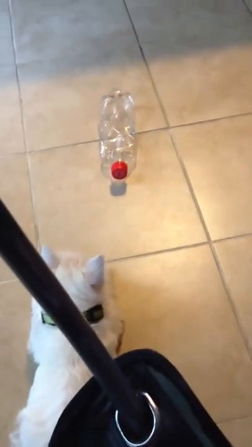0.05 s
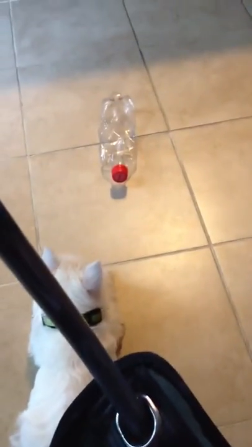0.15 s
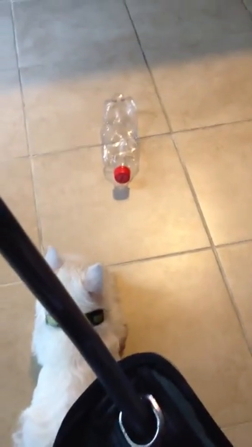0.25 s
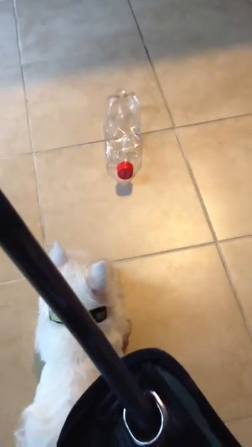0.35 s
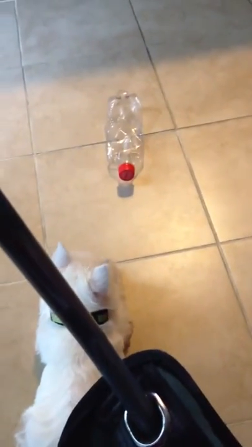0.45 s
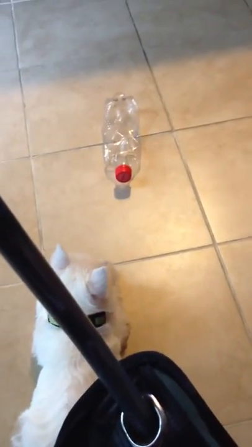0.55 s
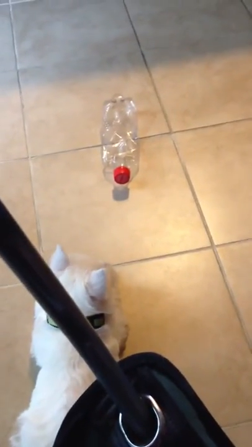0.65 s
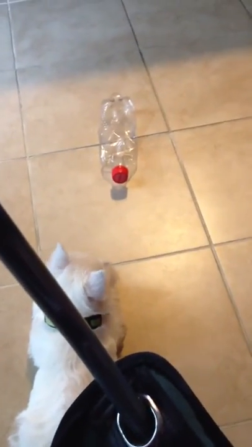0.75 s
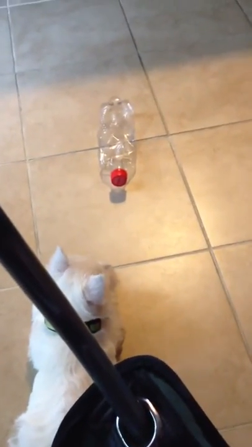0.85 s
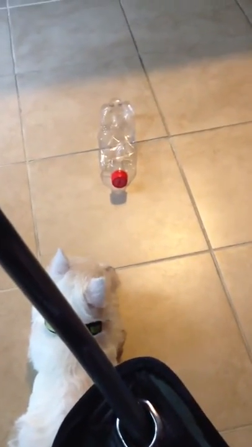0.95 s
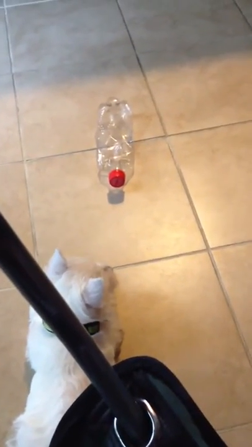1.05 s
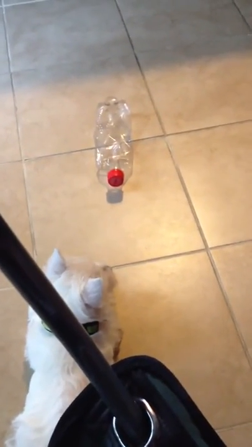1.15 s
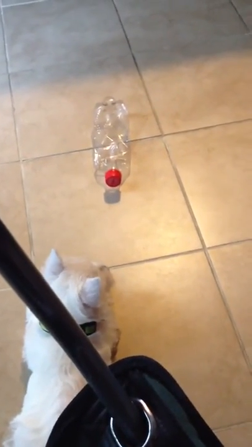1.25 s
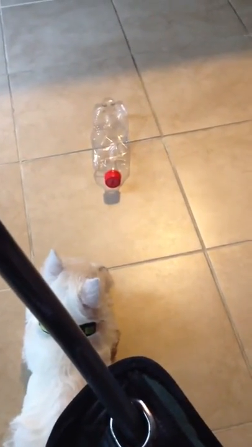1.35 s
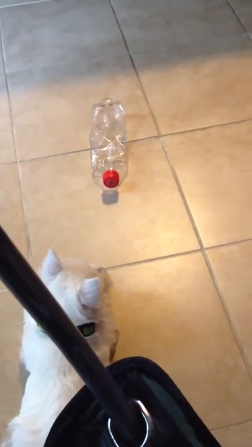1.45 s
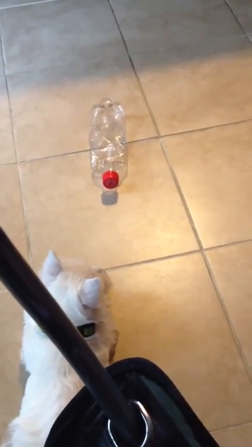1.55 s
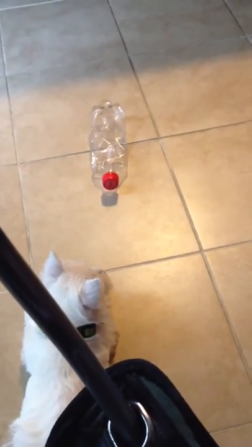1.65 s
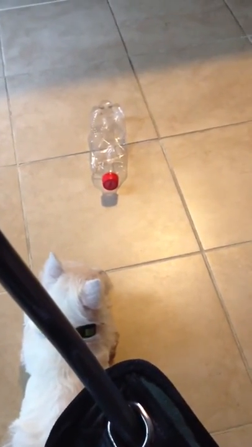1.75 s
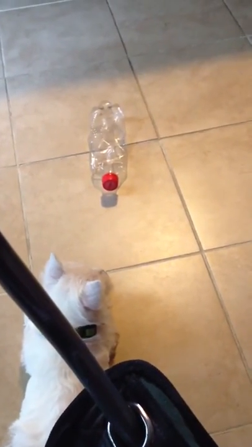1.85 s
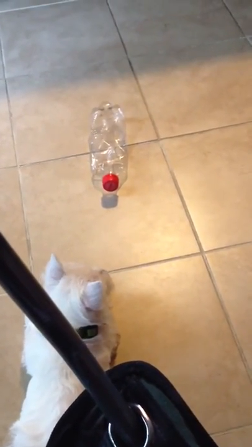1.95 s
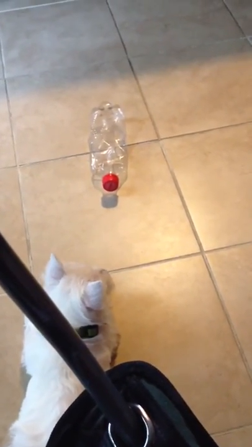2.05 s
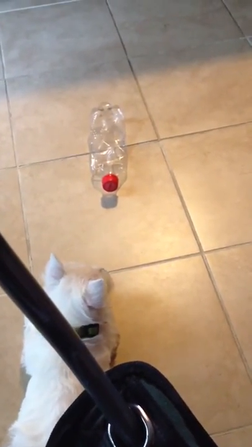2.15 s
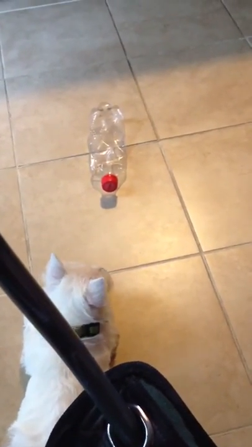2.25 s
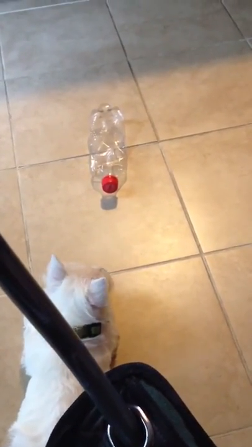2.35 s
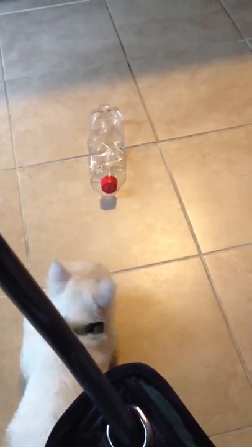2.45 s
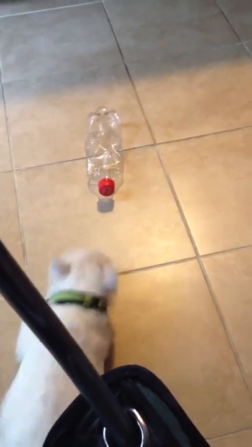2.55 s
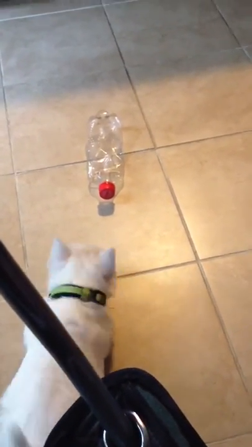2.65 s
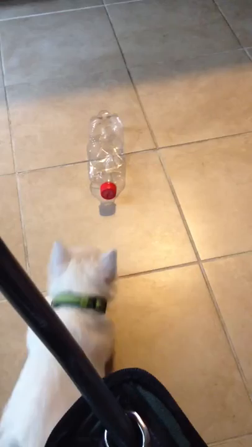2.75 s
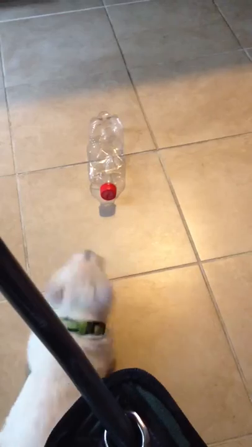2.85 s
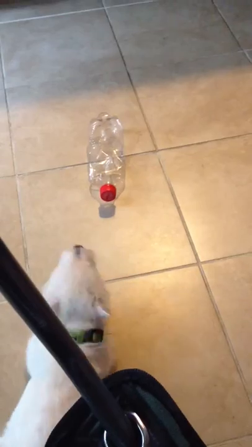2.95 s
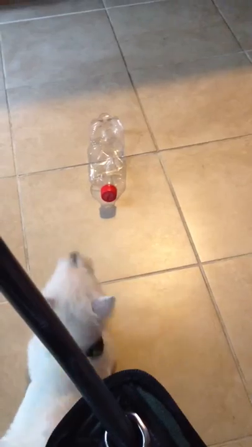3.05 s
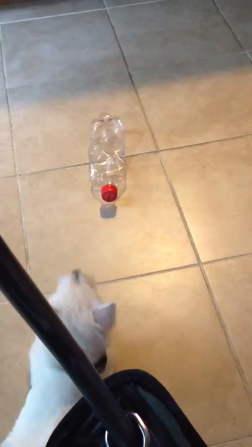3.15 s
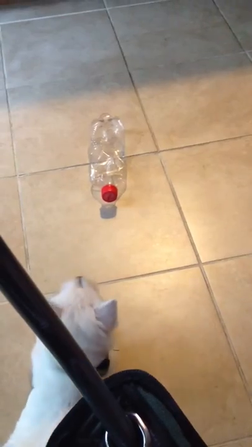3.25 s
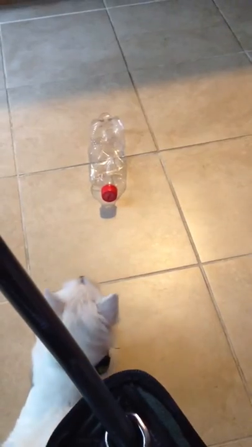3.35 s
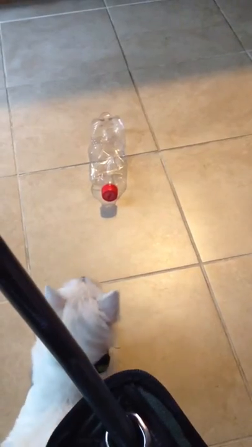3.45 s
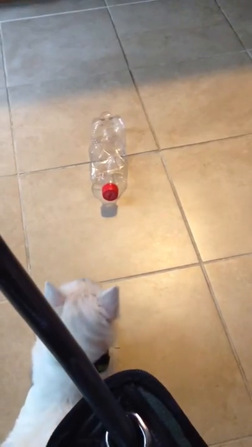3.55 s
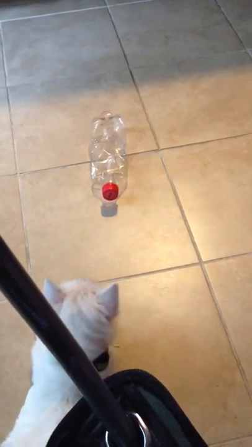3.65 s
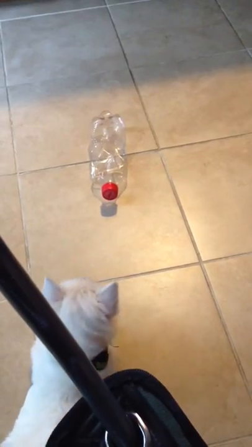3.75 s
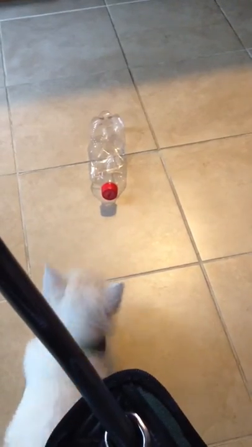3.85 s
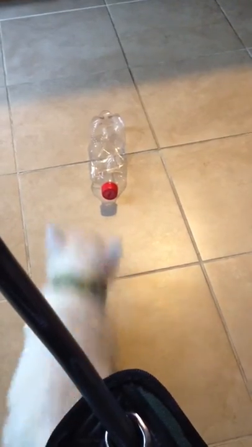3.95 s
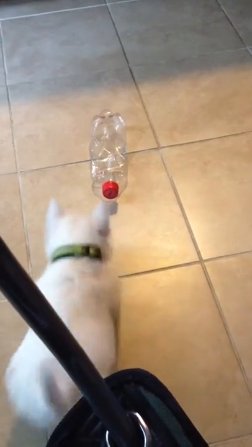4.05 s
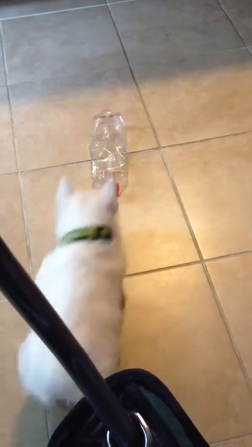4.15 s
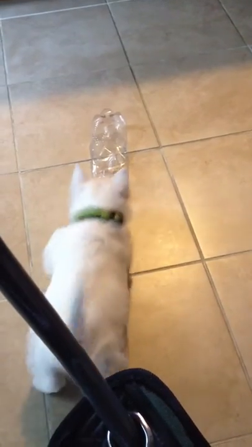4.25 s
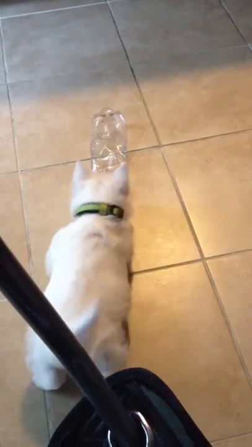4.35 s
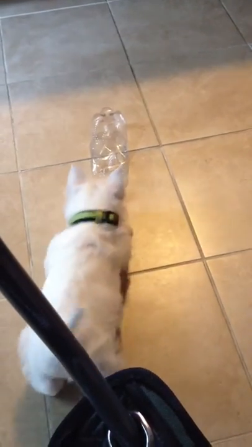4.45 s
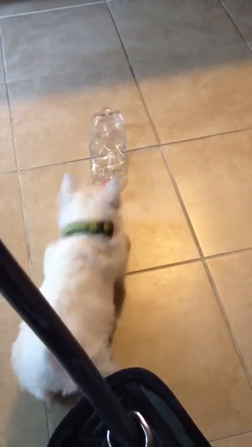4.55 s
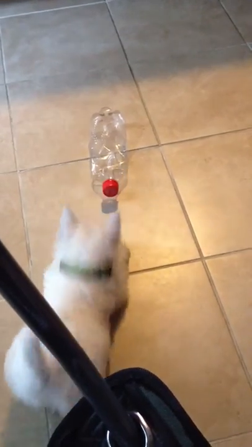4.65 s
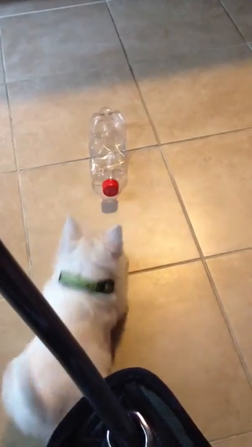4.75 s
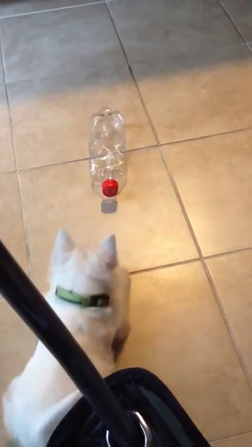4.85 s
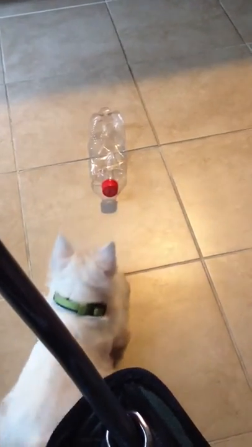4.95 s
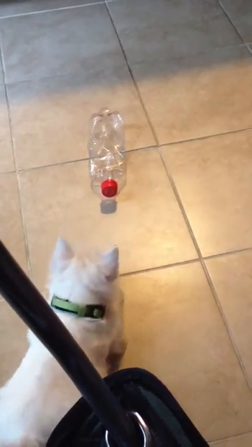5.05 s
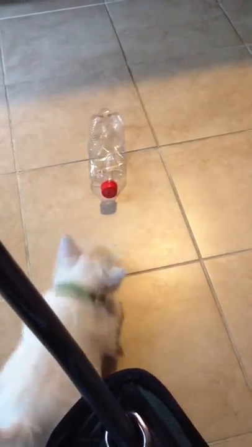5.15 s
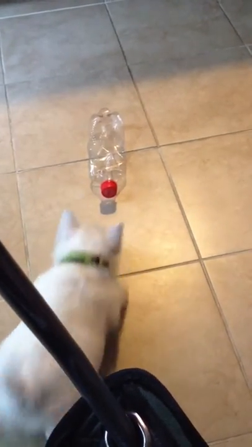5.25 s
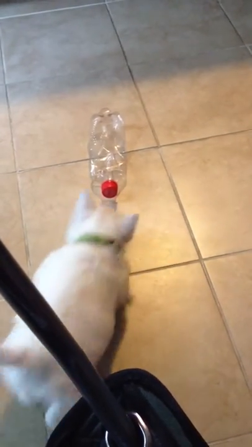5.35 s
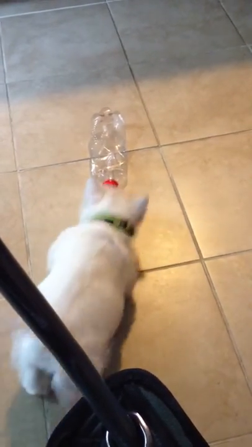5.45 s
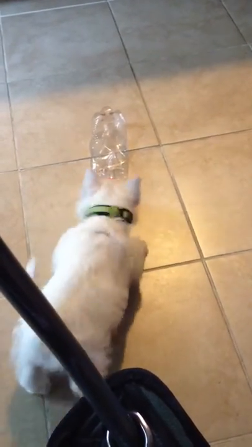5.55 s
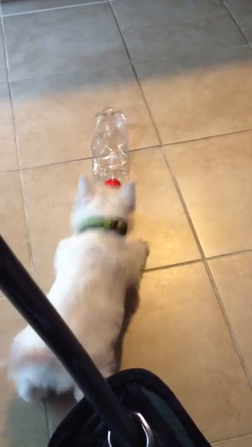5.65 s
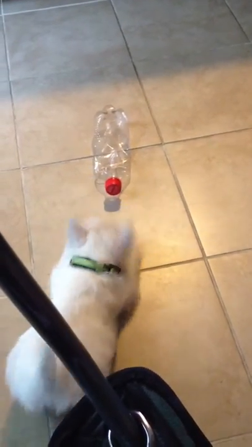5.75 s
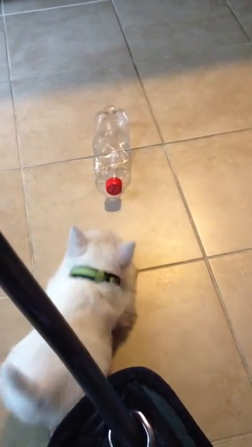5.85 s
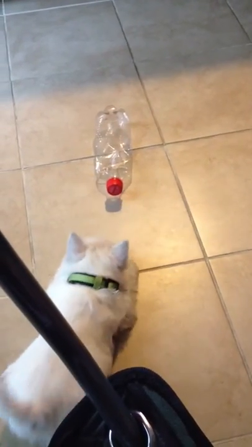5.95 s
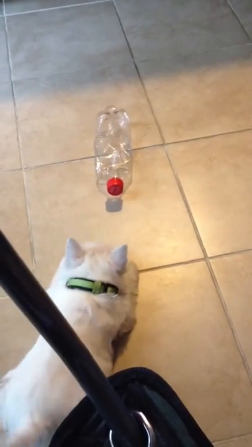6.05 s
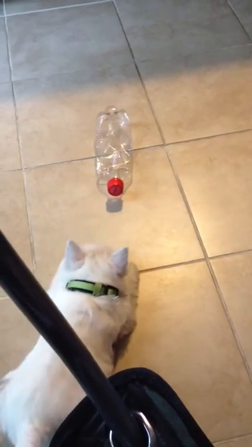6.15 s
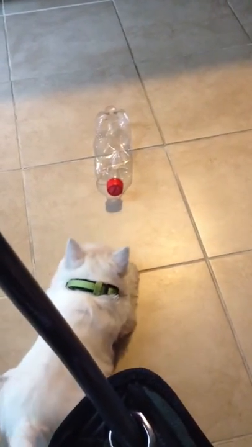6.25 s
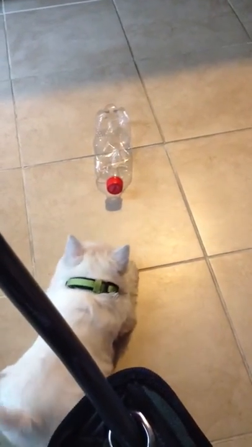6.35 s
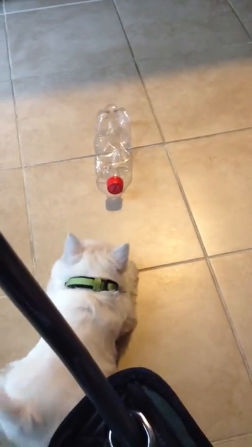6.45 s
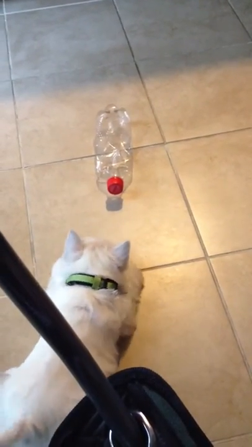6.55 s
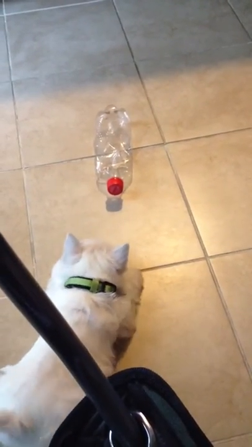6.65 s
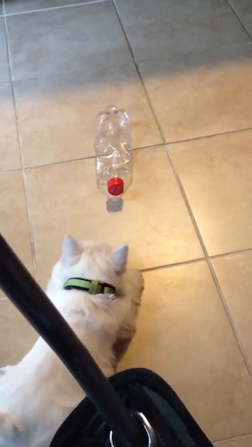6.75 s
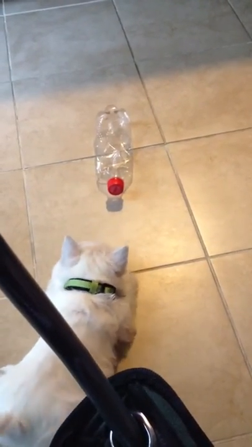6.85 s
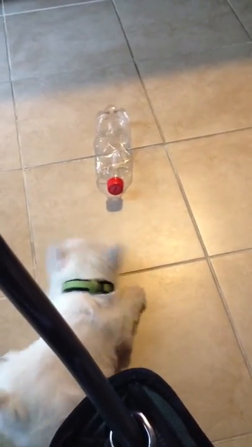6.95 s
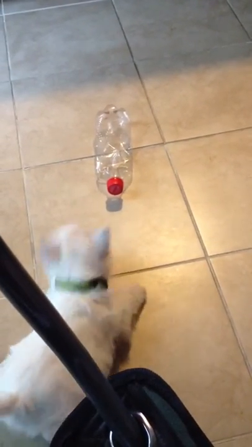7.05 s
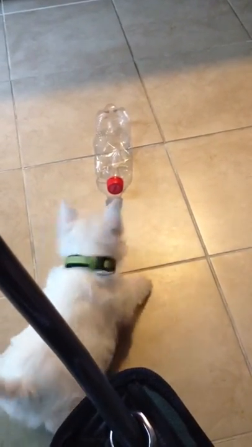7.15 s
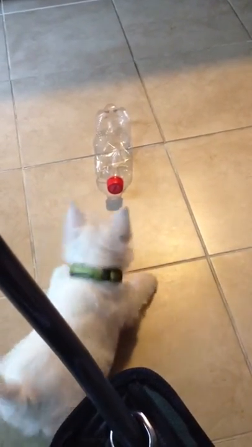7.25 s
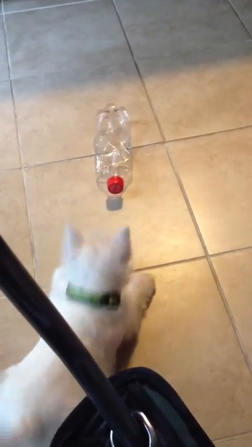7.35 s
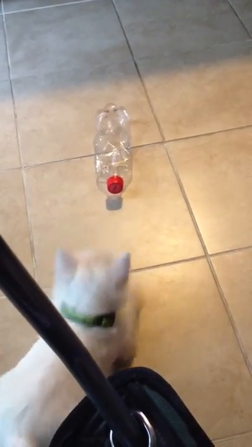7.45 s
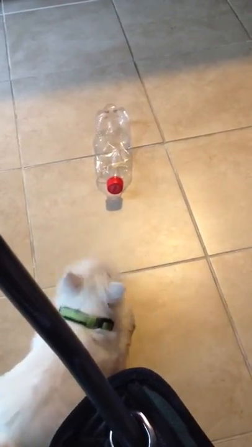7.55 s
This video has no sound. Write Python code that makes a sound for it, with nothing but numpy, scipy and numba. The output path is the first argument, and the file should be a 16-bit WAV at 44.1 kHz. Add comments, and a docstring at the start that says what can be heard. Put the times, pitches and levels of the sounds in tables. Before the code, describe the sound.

A small puppy is heard close by in a hard, echoing tiled room over a very quiet, steady, low-leaning hum. Soft airy sniffs come at about 0.1, 0.4 and 0.7 s, with a fainter one at 1.1 and a tiny paw and claw touch at 1.4. Two sharp yaps leap up in pitch at 2.5 and 2.9 s, each brief, with bright reflections ringing on. A very faint low growl grows from 3.4 into a rising, rougher woof at 3.8-4.1. At 4.4 a loud, crisp claw tick lands with a soft pad thud; another thud and a short sniff follow near 4.65. A strong, hoarse yap hits at 5.15. Low fluttering growls follow at 5.4, 5.8 and 6.1-6.8, then a muffled woof at 7.0 and a last rattling growl from 7.45 to the end. The small microphone gives little deep bass.

```python
"""A puppy in a hard, bare, tiled room, over a quiet steady hum made of coloured noise.
It sniffs (shaped noise) and a paw lands softly; then come two yaps, a low growl and a woof.
A claw ticks loudest, a pad thuds and one more sniff follows; then a yap, growls, a woof and a last growl.
Calls are vocal-fold pulses and breath sent through chest, throat and mouth; low growls flutter
about 25 times a second. Claws and pads are short dying tones, and the room adds an echoing tail."""
import sys
import numpy as np
from scipy import signal
from scipy.fft import rfft, irfft, next_fast_len
from scipy.io import wavfile
from scipy.ndimage import uniform_filter1d
from numba import njit

SR = 44100
rng = np.random.default_rng(int(sys.argv[2]) if len(sys.argv) > 2 else 0)


def persist_wave(psi):
    """Save psi, clipped to +-1, as 16-bit WAV."""
    counts = np.round(np.clip(psi, -1, 1) * 32767).astype(np.int16)
    wavfile.write(sys.argv[1], SR, np.atleast_2d(counts).T)


N = 335601

# Colour of the room hum. Each row: frequency in Hz, strength in dB per Hz (only the shape counts).
HUM_COLOUR = [(25, -29.5), (60, -23), (147, -3), (240, -0.5), (420, -5.5), (600, -7), (1100, -9),
              (2400, -17.5), (4500, -18), (7500, -21), (9800, -25), (12000, -22.5), (15300, -19)]
HUM_DB = -64  # average (rms) level before the microphone

# Puffs of air through the nostrils. Each row: start of full flow in seconds, start of release in seconds,
# level in dB, fall in dB per second.
SNIFFS = [(0.116, 0.248, -63, 131), (0.381, .436, -59, 136), (0.63, 0.753, -57.5, 115),
          (1.113, 1.15, -70, 72), (4.625, 4.633, -54, 300)]
# Colour of the sniffing air. Each row: frequency in Hz, strength in dB per Hz (only the shape counts).
SNIFF_COLOUR = [(880, -29), (1500, -14.5), (1960, -9.5), (2210, -10.5), (2500, -9), (4910, -6),
                (15000, -9.5)]
SNIFF_RISE_DB_PER_S = 300

# How the hard walls answer. Each row: frequency in Hz, time to die by 60 dB in seconds,
# level of the tail in dB relative to the direct sound.
ROOM = [(150.9, 0.17, 0.5), (380, 0.32, -5), (860, 0.27, 5), (1830, 0.39, -1.5), (3000, 0.39, -1.5),
        (4460, 0.45, -5), (7060, 0.24, 2), (15000, 0.12, -5)]
# Narrow bands where the room holds a clear yap's overtones longest. Each row: frequency in Hz, level in dB,
# time to die by 60 dB in seconds.
ROOM_RINGS = [(3790, -2, .6), (4745, 3, .95)]

# Claws touching the tile. Each row: time in seconds, strength in dB.
CLAWS = [(1.4441, -43.5), (3.789, -43), (4.4054, -17.5), (4.4114, -28), (4.4174, -32)]
# Tones in each claw tick. Each row: frequency in Hz, level in dB added to the strength,
# time to die by 60 dB in seconds.
CLAW_TONES = [(2300, -7, .002), (3500, -2, .0015), (4400, 0, .002), (5600, -2, .0015), (7000, -5, .0015),
              (12000, -7, .0015)]
# Paw pads landing. Each row: time in seconds, strength in dB before the soft rise and decay, frequency in Hz.
THUDS = [(1.442, -41.5, 570), (4.409, -33, 300), (4.669, -34.5, 260.3)]
THUD_CYCLES = 10  # swings it takes a thud to die by 60 dB

# One curve per bark or growl, in order of time. Each row of a curve: time in seconds, pitch in Hz,
# throat resonance in Hz, voice level in dB before any flutter, mouth level in dB over the voice.
CALL_CURVES = [
    [(2.392, 235.1, 835, -59, -17), (2.44, 324.6, 1260, -51.5, -12), (2.47, 391, 1160, -30, -3.5),
     (2.495, 524.2, 1500, -19.5, 1), (2.505, 886, 1410, -34, 14.5), (2.53, 928.7, 824, -28.5, 9.5),
     (2.56, 927.6, 890, -22, -16), (2.577, 977, 955, -19, -0.5), (2.587, 613.7, 1260, -15.5, -14.5),
     (2.61, 439, 1320, -37.5, 5.5), (2.65, 230, 1270, -48.5, 5)],
    [(2.805, 239.4, 1024, -42, -2), (2.83, 340, 1180, -32.5, -17.5), (2.858, 516, 1174, -25, -1),
     (2.886, 619.6, 1136, -17, -5.5), (2.893, 878, 1370, -21.5, 6.5), (2.915, 921.3, 925, -39.5, 17.5),
     (2.93, 942.7, 990, -22.5, -0.5), (2.97, 942, 910, -28, 1), (2.98, 635, 1080, -20.5, 0),
     (3.005, 470.5, 960, -42, 11), (3.06, 254, 900, -42, -16)],
    [(3.17, 159.4, 800, -77, 2.5), (3.398, 158.3, 597, -96.5, -0.5), (3.536, 154.2, 599.5, -77, -1.5),
     (3.744, 179, 594, -70, -7), (3.795, 173.8, 577, -58.5, -6.5)],
    [(3.8, 233.9, 640, -53.5, -28), (3.845, 379.8, 626, -46, -0.5), (3.89, 390.7, 1340, -36, 1),
     (3.935, 501.6, 1290, -21.5, -5.5), (3.96, 568.5, 1456, -27.5, -6.5), (3.985, 591, 1120, -44, 1),
     (4.02, 426.7, 1190, -28, -2), (4.06, 289.2, 780, -48.5, 6.5), (4.11, 236, 850, -64, 7)],
    [(5.095, 295, 1290, -54, -15), (5.122, 435, 1440, -28, -11.5), (5.132, 799, 1580, -30, 2.5),
     (5.152, 808, 1600, -12.5, -7), (5.18, 809.4, 1600, -23, -6), (5.19, 418, 1250, -27, -2),
     (5.215, 302, 900, -43, -12), (5.24, 244, 850, -69, -1)],
    [(5.33, 232, 770, -54, 2), (5.402, 279.6, 713, -42.5, 2.5), (5.45, 285.7, 733, -39.5, 3),
     (5.51, 239.7, 772, -69.5, -10.5)],
    [(5.72, 219.9, 863, -43.5, -26.5), (5.782, 284, 830, -39, 3.5), (5.868, 274.3, 850, -41.5, 4.5),
     (5.91, 243, 680, -45, -16), (6.02, 190.7, 730, -56, -2.5)],
    [(6.03, 184.3, 730, -58.5, -16), (6.19, 176.2, 747, -62, -7), (6.248, 184.7, 753, -57.5, -18),
     (6.348, 186.1, 724, -55.5, -10.5), (6.438, 219, 723, -46.5, -13), (6.59, 222.1, 694, -43, -12.5),
     (6.758, 205.5, 760, -58, -6.5), (6.8, 206.7, 778, -85, -1)],
    [(6.935, 274.2, 1150, -55, 6), (6.967, 316.5, 1270, -31.5, -1.5), (7.043, 338.2, 1080, -38.5, 11),
     (7.121, 271.6, 673, -42, -2), (7.17, 224, 680, -54.5, -5)],
    [(7.44, 251, 647, -89.5, -4), (7.49, 313.3, 712, -43.5, -3), (7.542, 315.5, 750, -39, 11.5),
     (7.61, 337.6, 680, -35, -8)],
]
# The body behind each call. Each row: moving mouth resonance in Hz at the start, the same in Hz at the end,
# its level in dB within the mouth sound, chest level in dB and nose hiss level in dB (both for a voice at
# MID_VOICE_DB), flutter depth from 0 to 1, flutter rate in Hz, time in seconds of one flutter crest.
VOICES = [(1100, 3100, -3.5, -41.5, -71.5, 0, 27, 4.1), (2600, 1760, 4.5, -40, -67, 0, 21, 2.5),
          (1802, 1834, -7, -42.5, -68, 0.28, 27.3, 3.2), (2460, 4180, 0.5, -35.5, -56.5, 0, 24, 4.0),
          (3100, 3600, -6, -42.5, -64.5, 0, 19, 5.15), (1757, 1650, 7.5, -40.5, -56.5, 0.27, 28, 5.408),
          (1805, 1570, 6, -38, -56.5, 0.24, 27.7, 5.85),
          (1918, 2030, -2.5, -42.5, -58.5, 0.23, 23.5, 6.655), (1816, 1900, 1.5, -38, -53.5, 0.02, 30, 9.2),
          (2000, 2000, 0, -39.5, -53.5, 0.34, 28, 7.6)]
# The vocal folds in each call. Each row: roughness from 0 (clear) to 1 (hoarse) before high pitch eases it,
# share by which pulses are alternately stronger and weaker.
FOLDS = [(.62, .12), (.42, .12), (.4, 0), (.4, 0), (.62, .4), (.26, 0), (.33, 0), (.36, 0), (.28, 0),
         (.32, 0)]
# Fixed resonances of the mouth cavity. Each row: frequency in Hz, width in Hz of each of two passes, level in dB.
MOUTH_MODES = [(1430, 770, -5), (2420, 1000, -8), (3754, 1110, -10), (4780, 1000, -10.5),
               (5930, 1540, -14.5), (8000, 3700, -33)]

MID_VOICE_DB = -40  # chest and nose have their table levels when the level they follow is here
CHEST_FOLLOWS, CHEST_LAG_S = 0.41, 0.018  # share of the voice's swing in dB; the chest dies later
NOSE_FOLLOWS, NOSE_LAG_S, NOSE_SMOOTH_S = 0.75, 0.022, 0.03  # the air stream follows sluggishly
HIGH_REGISTER_HZ, REGISTER_WIDTH_HZ = 704, 50  # above this pitch the chest fades
CHEST_DROP_DB = 28  # for perfectly even pulses
CHEST_BREATH = 1  # breath noise in the chest, relative to roughness
SINUS_HZ, SINUS_WIDTH_HZ, SINUS_DEPTH = 2890.0, 1040, 0.67  # side cavity that swallows a band
CLOSED_BELOW_HZ = 2200  # a mouth resonance staying below this means a nearly shut mouth


def from_db(db):
    """Turn decibels into a plain gain."""
    return 10 ** (np.asarray(db) / 20)


def at_hz(points, hz):
    """Read a table between its rows, on an axis where each octave is equally wide."""
    points = np.array(points)
    return np.interp(np.log(hz), np.log(points[:, 0]), points[:, 1])


def band(x, low_hz, high_hz, order=2):
    """Keep the sound between two frequencies with a smooth (Butterworth) filter."""
    return signal.sosfilt(signal.butter(order, [low_hz, high_hz], "band", fs=SR, output="sos"), x)


def coloured_noise(colour):
    """Shape even noise into a steady rush with the given colour and an rms level of 1."""
    n = next_fast_len(N)
    hz = np.arange(1, n // 2 + 2) * SR / n
    spectrum = rfft(rng.standard_normal(n)) * from_db(at_hz(colour, hz))
    noise = irfft(spectrum, n)[:N]
    return noise / np.std(noise)


def hum():
    """The quiet room hum is steady noise, strongest at low frequencies."""
    return from_db(HUM_DB) * coloured_noise(HUM_COLOUR)


def sniffs():
    """Air rushing through the nostrils makes noise puffs that rise quickly, hold and fall."""
    t = np.arange(N) / SR
    flow = np.zeros(N)
    for full_s, release_s, db, fall in SNIFFS:
        rise_db = SNIFF_RISE_DB_PER_S * np.clip(full_s - t, 0, 1)
        fall_db = fall * np.clip(t - release_s, 0, 2)
        flow += from_db(db - rise_db - fall_db)
    return flow * coloured_noise(SNIFF_COLOUR)


def room(x):
    """Hard walls return a dense random tail with its own decay and level in each band."""
    edges = 100 * 2 ** np.arange(0, 7.6, 0.5)  # half-octave bands
    t = np.arange(SR * 3 // 4) / SR
    onset = np.clip(t / 0.0028, 0, 1)  # floor and nearest walls answer within a few ms
    levels = np.array(ROOM)[:, ::2]
    tail = np.zeros(len(t))
    for low, high in zip(edges, edges[1:]):
        hz, width = np.sqrt(low * high), high - low
        decay = onset * from_db(-60 * t / np.clip(at_hz(ROOM, hz), 0.1, 1))
        # share out the energy so the level does not depend on band width or decay time
        share = from_db(at_hz(levels, hz)) * np.sqrt(SR / 2 / width / np.sum(decay ** 2))
        noise = band(rng.standard_normal(len(t)), low, high) * np.sqrt(2 * width / SR)
        tail += share * decay * noise
    return signal.fftconvolve(x, tail)[:N]


def room_rings(x):
    """The room lets two high overtones of a clear yap ring on, through two narrow resonances."""
    out = np.zeros(N)
    for hz, db, t60 in ROOM_RINGS:
        r = from_db(-60 / (t60 * SR))  # what is left after one sample
        top = [(1 - r * r) / 2, 0, (r * r - 1) / 2]
        bottom = [1, -2 * r * np.cos(2 * np.pi * hz / SR), r * r]
        out += from_db(db) * signal.lfilter(top, bottom, x + 1e-18)
    return out


def ring(at_s, db, hz, t60, rise_s):
    """A blow sets off one dying tone; a soft contact makes it rise slowly."""
    t = np.arange(int(2 * t60 * SR)) / SR
    out, start = np.zeros(N), int(at_s * SR)
    decay = from_db(db - 60 * t / t60)
    out[start:start + len(t)] = decay * np.sin(2 * np.pi * hz * t) * np.minimum(t / rise_s, 1)
    return out


def paws():
    """Hard claws tick with several bright tones; soft pads land with one short low knock."""
    out = np.zeros(N)
    for at_s, db in CLAWS:
        for hz, tone_db, t60 in CLAW_TONES:
            chance_db = rng.normal(0, 1)
            out += ring(at_s, db + tone_db + chance_db, hz, t60, rise_s=0.00017)
    for at_s, db, hz in THUDS:
        out += ring(at_s, db, hz, THUD_CYCLES / hz, rise_s=0.0031)
    return out


def span(rows, fade_s):
    """Give a curve's first sample, its columns drawn out over time, and its soft ends."""
    s, *columns = np.transpose(rows)
    t = np.arange(int(max(s[0], 0) * SR), min(int((s[-1] + fade_s) * SR), N)) / SR
    ends = np.clip(np.minimum(t - s[0], s[-1] + fade_s - t) / fade_s, 0, 1)
    return round(t[0] * SR), [np.interp(t, s, column) for column in columns], ends


def drift(n, hz):
    """Smoothed noise wanders slowly by chance, with a spread of 1."""
    r = np.exp(-2 * np.pi * hz / SR)
    slow = signal.lfilter([1], [1, -2 * r, r * r], rng.standard_normal(n + 4000))[4000:]
    return slow * np.sqrt((1 - r * r) ** 3 / (1 + r * r))


def evened(x):
    """Hold the level at rms 1 over about 25 ms."""
    return x / np.sqrt(uniform_filter1d(x ** 2, size=1100) + 1e-12)


def lingering(db, lag_s):
    """A level that rises at once and sinks with a delay."""
    lag = int(lag_s * SR)
    late = np.concatenate([np.full(lag, db[0]), db])[:len(db)]
    return np.maximum(db, late)


@njit
def resonate(x, hz, width, sr):
    """A resonance favours a band whose centre can move, with gain 1 at its top."""
    y, r = np.zeros(len(x)), np.exp(-np.pi * width / sr)
    for i in range(2, len(x)):
        c = 2 * r * np.cos(2 * np.pi * hz[i] / sr)
        y[i] = (1 - r * r) / 2 * (x[i] - x[i - 2]) + c * y[i - 1] - r * r * y[i - 2]
    return y


def twice(x, hz, width):
    """A resonance passed twice, so that the sound falls away steeply on both sides."""
    hz = hz + np.zeros(len(x))
    return resonate(resonate(x, hz, width, SR), hz, width, SR)


@njit
def tube(x, hz, width, sr):
    """The first resonance of a tube lets low sound through and weakens what lies above."""
    y, r = np.zeros(len(x)), np.exp(-np.pi * width / sr)
    for i in range(2, len(x)):
        c = 2 * r * np.cos(2 * np.pi * hz[i] / sr)
        y[i] = (1 - c + r * r) * x[i] + c * y[i - 1] - r * r * y[i - 2]
    return y


def vocal_folds(pitch, rough, halving):
    """The folds let out sharp pulses, and air rushes through while they are open."""
    n = len(pitch)
    phase = 2 * np.pi * np.cumsum(pitch + 45 * rough * drift(n, 70)) / SR  # hoarse folds wander in pitch
    shape = np.exp((4500 / pitch) ** 2 * (np.cos(phase) - 1))
    uneven = from_db(5 * rough * drift(n, 150))  # hoarse pulses vary in strength
    pulses = evened(shape * uneven * (1 + halving * np.cos(phase / 2)))
    breath = rng.standard_normal(n) * (1 + 0.19 * np.cos(phase))
    return pulses, breath


def throat_sound(source, throat_hz):
    """The throat is a tube whose resonance moves; three passes darken the sound."""
    throat = band(source, 430, 9000)
    for width in (200.0, 450.0, 700.0):
        throat = tube(throat, throat_hz, width, SR)
    return evened(throat)


def mouth_sound(airy, from_hz, to_hz, moving_db):
    """The mouth has one moving resonance and several fixed ones; nearly shut, it loses a band."""
    n = len(airy)
    mouth = from_db(moving_db) * twice(airy, np.linspace(from_hz, to_hz, n), 310.0)
    below = sum(2 * hz < from_hz + to_hz for hz, _, _ in MOUTH_MODES)
    for k, (hz, width, db) in enumerate(MOUTH_MODES):
        sign = -(-1) ** (k - below + (k < below))  # signs alternate outward from the moving mode
        mouth = mouth + sign * from_db(db) * twice(airy, hz, float(width))
    if max(from_hz, to_hz) < CLOSED_BELOW_HZ:
        swallowed = resonate(mouth, np.full(n, SINUS_HZ), SINUS_WIDTH_HZ, SR)
        mouth = mouth - SINUS_DEPTH * swallowed
    return evened(mouth)


def call(rows, voice, folds):
    """One bark or growl: fold pulses and breath sound through chest, throat, mouth and nose."""
    start, (pitch, throat_hz, voice_db, bright_db), ends = span(rows, fade_s=0.036)
    mouth_from_hz, mouth_to_hz, moving_db, chest_db, nose_db, depth, throb_hz, crest_s = voice
    rough, halving = folds
    n = len(pitch)

    # the chest follows the voice, and fades in the high register
    high = 1 / (1 + np.exp((HIGH_REGISTER_HZ - pitch) / REGISTER_WIDTH_HZ))
    chest_db = chest_db + CHEST_FOLLOWS * (lingering(voice_db, CHEST_LAG_S) - MID_VOICE_DB)
    chest_db = chest_db - CHEST_DROP_DB * high * (1 - halving)
    mouth_db = voice_db + bright_db
    air_db = uniform_filter1d(lingering(mouth_db, NOSE_LAG_S), int(NOSE_SMOOTH_S * SR) + 1)
    nose_db = nose_db + NOSE_FOLLOWS * (air_db - MID_VOICE_DB)

    rough = rough * np.minimum((560 / pitch) ** 2, 1)  # taut folds swing cleanly at high pitch
    pulses, breath = vocal_folds(pitch, rough, halving)
    source = pulses + 2.2 * rough * breath
    airy = source + 0.76 * rough * breath  # the open mouth passes more turbulence
    chest = evened(band(pulses + CHEST_BREATH * rough * breath, 200, 640, order=4))
    throat = throat_sound(source, throat_hz)
    mouth = mouth_sound(airy, mouth_from_hz, mouth_to_hz, moving_db)
    nose = evened(band(breath, 12000, 17000))

    # the flutter is not quite regular, and is deepest in chest and throat
    t = (start + np.arange(n)) / SR
    sway = 0.35 * drift(n, 6)
    throb = 1 + depth * np.cos(2 * np.pi * throb_hz * (t - crest_s) + sway)
    low = throb ** 2.6 * (from_db(chest_db) * chest + from_db(voice_db) * throat)
    upper = np.sqrt(throb) * from_db(mouth_db) * mouth
    out = np.zeros(N)
    out[start:start + n] = ends * (low + upper + from_db(nose_db) * nose)
    return out


def scene():
    """The puppy's nose, paws and voice in the echoing room, over the hum."""
    calls = sum(call(*parts) for parts in zip(CALL_CURVES, VOICES, FOLDS))
    puppy = sniffs() + paws() + calls
    return (hum() + puppy + room(puppy) + room_rings(puppy))[None]


def record(dry):
    """A small microphone catches no deep bass, and the top is cut sharply."""
    thin = signal.sosfilt(signal.butter(2, 120, "high", fs=SR, output="sos"), dry)
    # from 15450 Hz up, all is at least 75 dB weaker
    return signal.sosfilt(signal.cheby2(16, 75, 15450, fs=SR, output="sos"), thin)


dry = scene()
out = record(dry)
persist_wave(out)
```